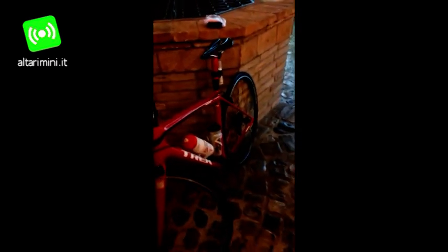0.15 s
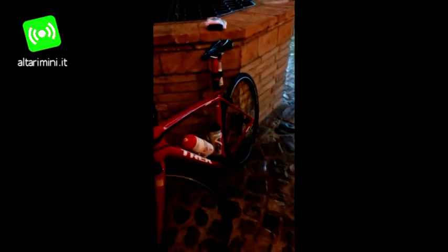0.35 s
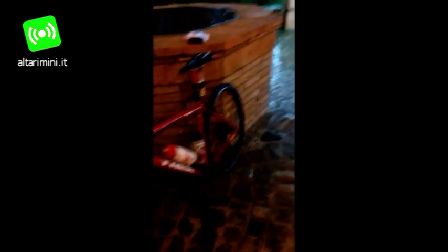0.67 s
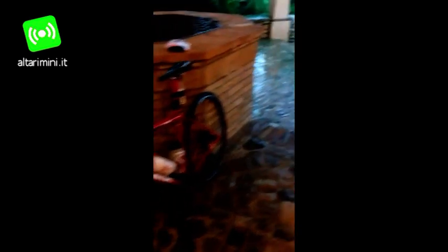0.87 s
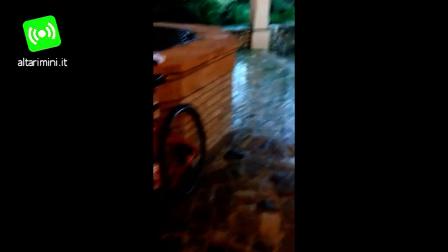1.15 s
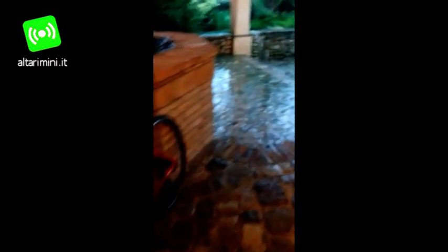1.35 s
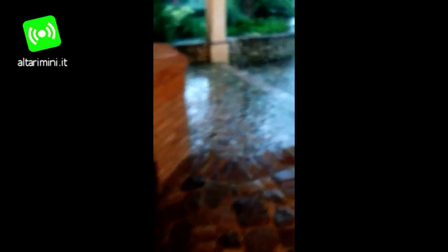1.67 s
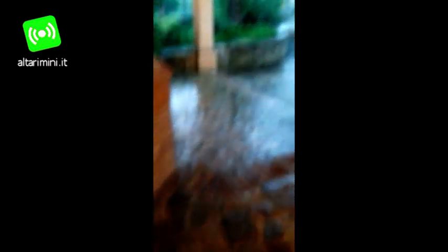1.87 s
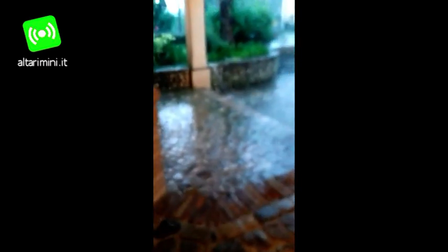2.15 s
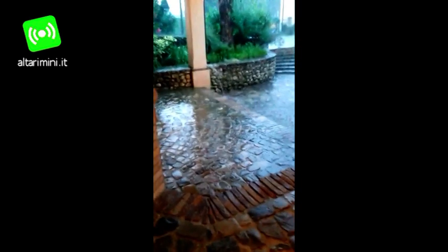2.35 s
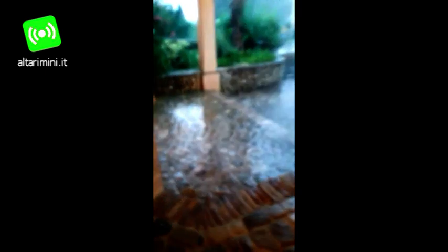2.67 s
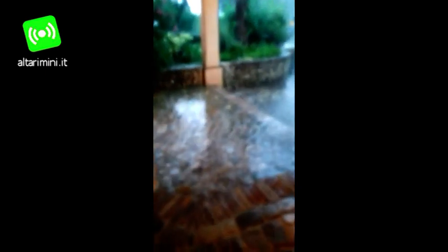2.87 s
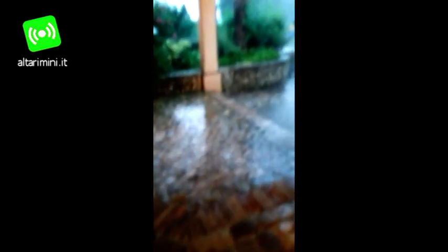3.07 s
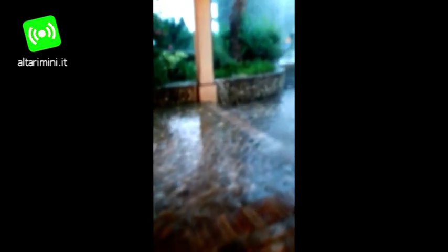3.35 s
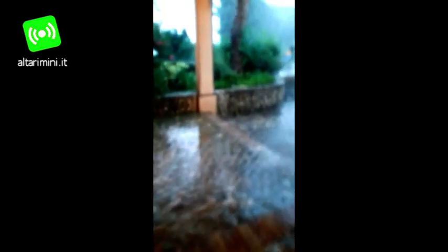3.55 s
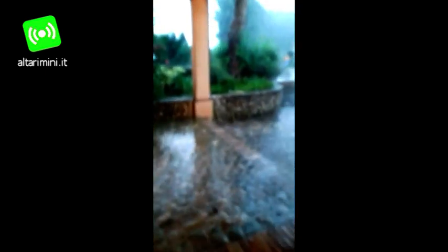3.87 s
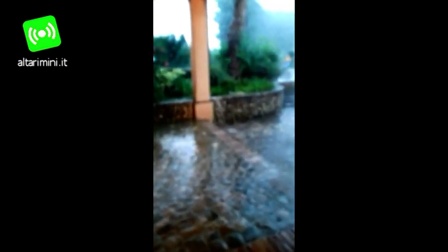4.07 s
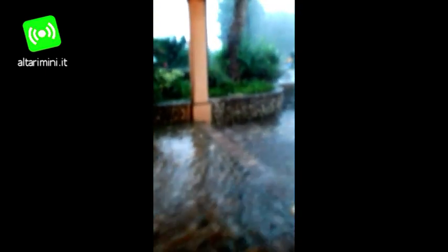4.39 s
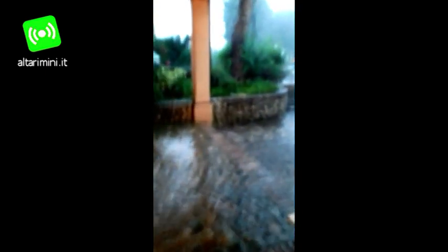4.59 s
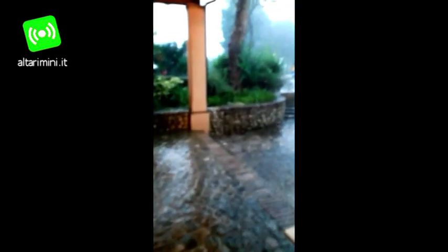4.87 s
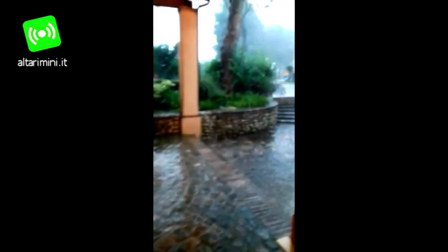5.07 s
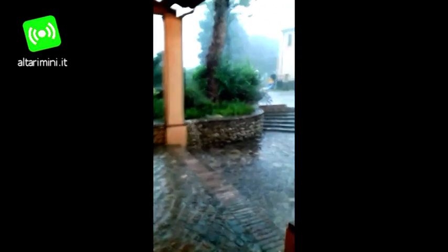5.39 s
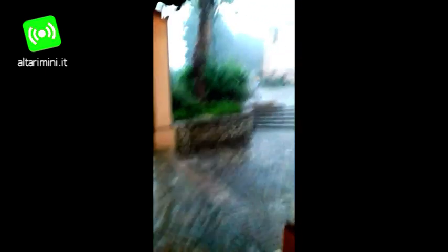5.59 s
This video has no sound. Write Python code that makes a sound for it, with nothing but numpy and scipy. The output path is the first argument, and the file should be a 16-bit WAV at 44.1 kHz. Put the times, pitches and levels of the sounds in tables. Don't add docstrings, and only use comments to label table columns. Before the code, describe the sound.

A dense, harsh hissing downpour pounds a stone yard, split by hard ticks of hail, brightening slightly as the listener turns outward.

```python
import sys
import numpy as np
from scipy import signal
from scipy.fft import rfft, irfft
from scipy.io import wavfile

SR = 44100
rng = np.random.default_rng(int(sys.argv[2]) if len(sys.argv) > 2 else 0)


def nominal_scale(level):
    x = np.asarray(level, float) / 20
    return 10 ** x


def log_audio(samples):
    frames = np.atleast_2d(samples).T
    limited = np.clip(frames, -1, 1)
    pcm = np.round(limited * 32767).astype(np.int16)
    wavfile.write(sys.argv[1], SR, pcm)


N = 252693
HZ = np.arange(N // 2 + 1) * SR / N + 1e-3

# pitch_hz, level_db (per Hz)
ROAR_SPECTRUM = [(20, -51), (45, -29), (130, -8), (260, -10), (430, -13.5), (800, -15), (1200, -12.5),
                 (1800, -8.5), (3000, -6.5), (4500, -6), (5700, -12.5), (7200, -18), (12800, -23.5),
                 (15100, -33)]
ROAR_LEVEL_DB = -22
# pitch_hz, near_drop_share (0-1), flicker_db
GRAIN_BY_PITCH = [(100, 0.03, 1), (1000, 0.04, 0.03), (4000, 0.16, 0.42), (8000, 0.18, 0.54),
                  (13000, 0.4, 1)]
# time_s, level_db
ROOF_DRUMMING = [
    (0.0, -41.5),
    (2.23, -42.5),
    (3.05, -37.5),
    (4.18, -37),
    (4.31, -38.5),
    (5.68, -40),
    (5.73, -38),
]
# time_s, level_db
DOWNPOUR_STRENGTH = [(0, -21.5), (.2, -21.5), (.55, -22.5), (.92, -22.5), (1.2, -22.5), (1.55, -20.5),
                     (1.75, -21.5), (2.2, -21), (2.55, -21), (2.9, -21.5), (3.5, -20.5), (3.63, -22.5),
                     (4.0, -21.5), (4.38, -21.5), (4.68, -21.5), (5.0, -21), (5.4, -21), (5.73, -21)]
# pitch_hz, roof_share, downpour_share, facing_yard_gain_db
GUST_RESPONSE = [(150, 0.83, 0.07, -1), (600, 0.095, 0.021, 1.6), (1900, 0, 1.1, 1.5),
                 (3900, 0.094, 1.05, 0), (7500, 0, 0.55, 0.9), (13000, 0, 0.36, 1.5)]
# start_s, centre_hz, lift_db, fade_s
WATER_SURGES = [(.058, 4000, 5.5, 0.056), (.76, 8000, 2, .07), (.97, 3000, 2, 0.15), (1.25, 4000, 2.5, .09),
                (1.475, 1990, 3.5, .06), (1.78, 7000, 2.5, .08), (2.06, 2000, 0, 0.069),
                (2.95, 169, 4, 0.25), (2.96, 3500, 2, 0.12), (3.15, 1510, -2.5, 0.31),
                (4.42, 8000, -1, 0.23), (5.55, 1600, 2, 0.24), (4.02, 4000, 2, 0.08), (4.08, 170, 2, 0.12),
                (4.42, 4000, 3.5, 0.08), (4.74, 4000, 1.5, 0.17), (4.82, 8000, 1.5, 0.18),
                (5.45, 3500, 1.5, 0.17)]
TURN_START_S, TURN_END_S = 0.35, 2.5

# start_s, peak_db, ring_hz
NEAR_STONES = [(0.0611, -9.0, 3600), (0.0937, -9.0, 4200), (0.2922, -22.0, 6700), (0.6957, -10.0, 3800),
               (0.7753, -17.0, 7000), (0.7796, -22.0, 6400), (0.8069, -22.0, 6200), (0.8315, -25.0, 12400),
               (1.0178, -10.0, 4000), (1.3251, -26.0, 11000), (1.8226, -21.0, 6400), (1.9114, -26.0, 11100),
               (1.9129, -21.0, 6700), (2.1154, -9.0, 3700), (2.2199, -26.0, 11500), (2.3993, -20.0, 6200),
               (2.7312, -26.0, 12000), (2.8185, -21.0, 6800), (2.9855, -9.0, 3900), (3.0050, -8.0, 4000),
               (3.0051, -24.0, 11700), (3.2529, -22.0, 6300), (3.2622, -21.0, 7600), (3.3742, -8.0, 3700),
               (3.4448, -9.0, 3900), (3.7178, -21.0, 6300), (4.0332, -8.0, 4000), (4.42, -21.0, 6300),
               (4.5276, -20.0, 6400), (4.7642, -8.0, 3800)]
RING_CYCLES, SMALL_STONE_TRIM_DB, SPLASH_DB = 10, 9, -6
GRIT_COUNT = 29
GRIT_DB, GRIT_SPREAD_DB, GRIT_HZ, GRIT_SPREAD_HZ = -30.5, 1.0, 11700, 450

# centre_hz, half_width_hz, gain_db
PORT_RESONANCE = (3960, 624, 5.84)
# centre_hz, half_width_hz, gain_db
PORT_CANCELLATION = (9920, 220, -6.5)
BLOCK, BLOCK_OFFSET = 1024, 711
TOP_HZ, TOP_OPEN_BLOCKS = 15100, [26, 68, 226]
# block_number, lower_edges_hz
NOISE_PATCHES = [
    (0, [12300]),
    (67, [4500, 11300]),
    (88, [12000]),
    (89, [8800]),
    (123, [4700, 12300, 13700]),
    (168, [4150, 6200, 12300, 13700]),
    (178, [5000, 12300]),
    (217, [6200, 13000]),
    (227, [5000]),
    (243, [9600, 12300]),
]
PATCH_WIDTH_HZ = 1500


def downpour():
    gusts_db = swings(ROOF_DRUMMING) + swings(DOWNPOUR_STRENGTH) + [facing()]
    far = rfft(rng.standard_normal(N))
    near = near_drops()
    near_share = np.clip(at_hz(GRAIN_BY_PITCH, HZ), 0, 1)
    grains = np.sqrt(1 - near_share) * far + np.sqrt(near_share) * near
    roar = nominal_scale(at_hz(ROAR_SPECTRUM, HZ)) * grains

    centres = np.geomspace(60, 14000, 18)
    common_flicker = drift(30)
    out = np.zeros(N)
    for k, hz in enumerate(centres):
        weight = np.interp(np.log(HZ), np.log(centres), np.arange(18) == k)
        band = irfft(roar * weight, N)
        gust_db = sum(at_hz(GUST_RESPONSE, hz, axis=j + 1) * g for j, g in enumerate(gusts_db))
        flicker_db = at_hz(GRAIN_BY_PITCH, hz, axis=2) * (0.5 * common_flicker + drift(44))
        out += band * nominal_scale(gust_db + surge_db(hz) + flicker_db)
    return nominal_scale(ROAR_LEVEL_DB) * rms_one(out)


def near_drops():
    showers = [rfft(drops(per_s, spread_db=2.0)) for per_s in (2000, 1500, 1500)]
    centres = np.log([4500, 7500, 11500])
    reach = [np.interp(np.log(HZ), centres, np.arange(3) == k) for k in range(3)]
    return sum(np.sqrt(part) * shower for part, shower in zip(reach, showers))


def drops(per_s, spread_db):
    size_db = spread_db * np.minimum(rng.exponential(1, N), 3.5)
    sizes = nominal_scale(size_db) * rng.choice([-1, 1], N)
    return rms_one(sizes * (rng.random(N) < per_s / SR))


def surge_db(hz, octaves=0.65):
    t = np.arange(N) / SR
    lift = np.zeros(N)
    for start_s, centre_hz, db, fade_s in WATER_SURGES:
        age = np.clip(t - start_s, 0, None)
        nearness = np.exp(-(np.log2(hz / centre_hz) / octaves) ** 2)
        onset = np.minimum(age / 0.0038, 1)
        lift += db * nearness * onset * np.exp(-(age / fade_s) ** 2)
    return lift


def facing():
    progress = np.clip((np.arange(N) / SR - TURN_START_S) / (TURN_END_S - TURN_START_S), 0, 1)
    turn = np.sin(np.pi / 2 * progress) ** 2
    return turn - turn.mean()


def swings(rows):
    time_s, *columns = np.transpose(rows)
    lines = [np.interp(np.arange(N) / SR, time_s, column) for column in columns]
    return [line - line.mean() for line in lines]


def drift(rate_hz):
    pole = np.exp(-80 * np.pi * rate_hz / SR)
    noise = rng.standard_normal(N // 40 + 2002)
    slow = signal.lfilter([1], [1, -2 * pole, pole * pole], noise)[2000:]
    return np.interp(np.arange(N) / 40, np.arange(len(slow)), rms_one(slow))


def hail():
    out = np.zeros(N + 600)
    t = np.arange(300) / SR
    stones = NEAR_STONES + small_stones()
    for (start_s, peak_db, hz), lag in zip(stones, rng.random(len(stones))):
        ring = np.sin(2 * np.pi * hz * t) * nominal_scale(-60 * t * hz / RING_CYCLES)
        if hz > 5000:
            trim_db = SMALL_STONE_TRIM_DB + 3 * (hz > 10000)
        else:
            trim_db = -1
        at = round(start_s * SR) - 6
        out[at:at + 300] += nominal_scale(peak_db + trim_db) * ring
        at += round((1 + 2 * lag) * SR / 1000)
        out[at:at + 300] += nominal_scale(peak_db + trim_db + SPLASH_DB) * ring
    return out[:N]


def small_stones():
    start_s = 0.01 + rng.random(GRIT_COUNT) * (N / SR - 0.02)
    size, pitch = rng.standard_normal((2, GRIT_COUNT))
    peak_db = GRIT_DB + GRIT_SPREAD_DB * size
    ring_hz = GRIT_HZ + GRIT_SPREAD_HZ * pitch
    return list(zip(start_s, peak_db, ring_hz))


def rms_one(x):
    return x / np.sqrt(np.mean(x ** 2) + 1e-20)


def at_hz(points, hz, axis=1):
    table = np.array(points)
    return np.interp(np.log(hz), np.log(table[:, 0]), table[:, axis])


def scene():
    return np.tile(downpour() + hail(), (2, 1))


def top_cut(x, knee_hz=14600, fall_db=12, open_db=3):
    spectrum = rfft(x)
    above_knee = np.clip((HZ - knee_hz) / (TOP_HZ - knee_hz), 0, 1)
    kept = nominal_scale(-fall_db * above_knee ** 2) * (HZ < TOP_HZ)
    blocks = (np.arange(N) - BLOCK_OFFSET) / BLOCK
    gate = sum(np.cos(np.pi / 2 * np.clip(blocks - k, -1, 1)) ** 2 for k in TOP_OPEN_BLOCKS)
    top = irfft(spectrum * (HZ >= TOP_HZ), N)
    return irfft(spectrum * kept, N) + nominal_scale(open_db) * gate * top


def noise_patches(x, fill_db=0.3):
    out = x.copy()
    window = signal.windows.kaiser_bessel_derived(2 * BLOCK, 4 * np.pi) ** 2
    for block, lower_edges in NOISE_PATCHES:
        at = np.arange(-BLOCK, BLOCK) + BLOCK_OFFSET + block * BLOCK
        keep = at >= 0
        for low in lower_edges:
            band = irfft(rfft(x[0]) * ((HZ > low) & (HZ < low + PATCH_WIDTH_HZ)), N)
            others = np.array([band[(at + 5 * BLOCK) % N], band[(at - 5 * BLOCK) % N]])
            out[:, at[keep]] += (window * (nominal_scale(fill_db) * others - band[at % N]))[:, keep]
    return out


def band_limit(x):
    return signal.sosfilt(signal.butter(12, 15750, fs=SR, output="sos"), x)


def record(dry):
    port_db = sum(gain_db / (1 + ((HZ - hz) / half_width_hz) ** 2)
                  for hz, half_width_hz, gain_db in (PORT_RESONANCE, PORT_CANCELLATION))
    x = irfft(rfft(dry) * nominal_scale(port_db), N)
    x = x / (1 + (x / 0.5) ** 8) ** (1 / 8)
    mix = noise_patches(top_cut(x))
    return band_limit(mix)


dry = scene()
out = record(dry)
log_audio(out)
```